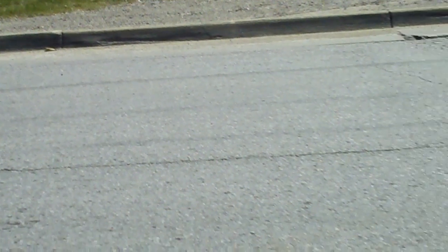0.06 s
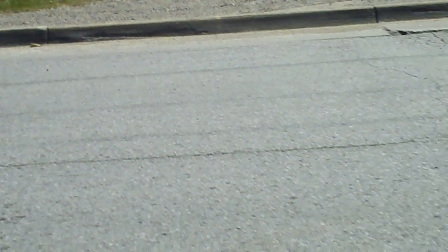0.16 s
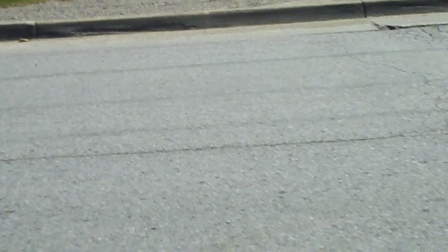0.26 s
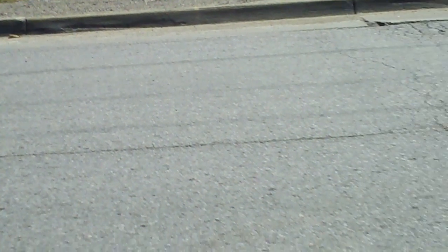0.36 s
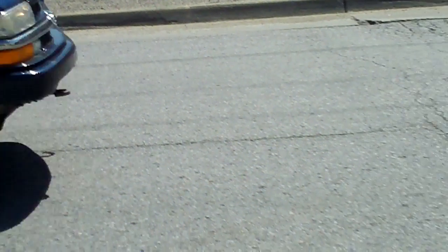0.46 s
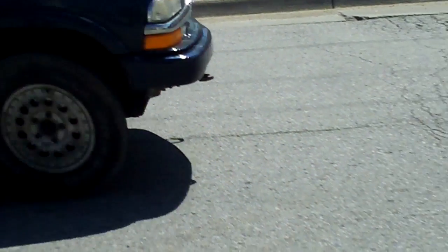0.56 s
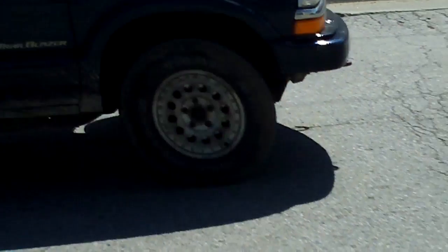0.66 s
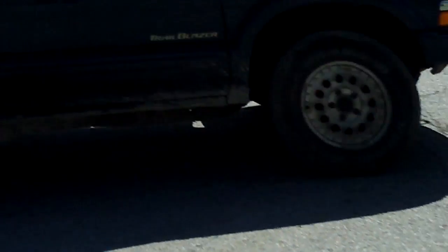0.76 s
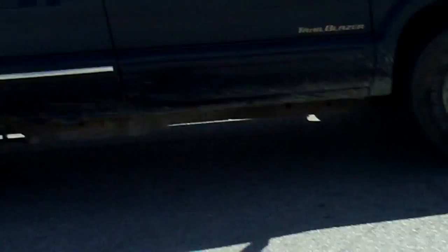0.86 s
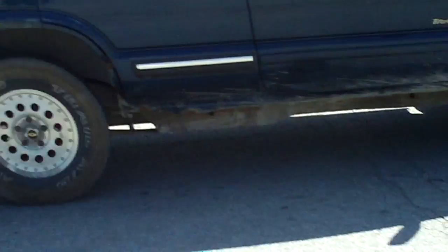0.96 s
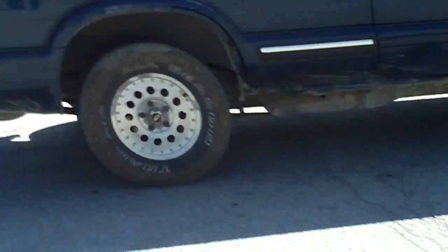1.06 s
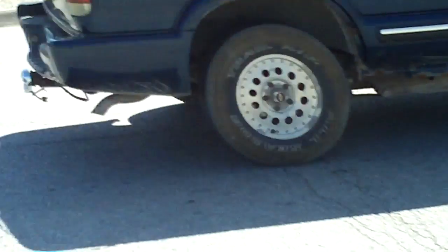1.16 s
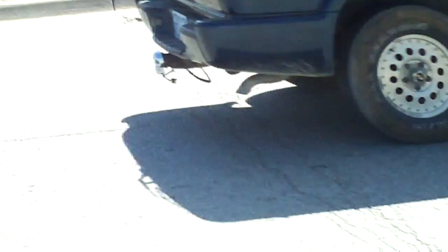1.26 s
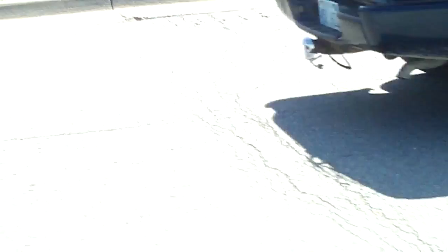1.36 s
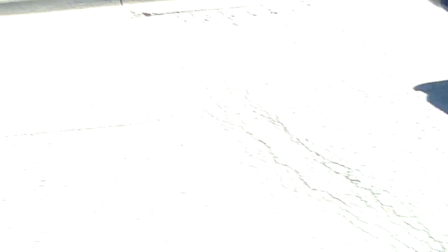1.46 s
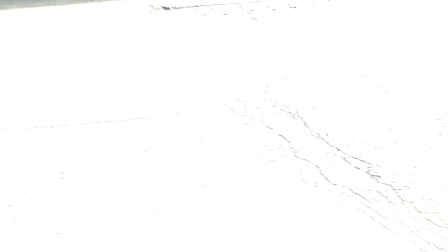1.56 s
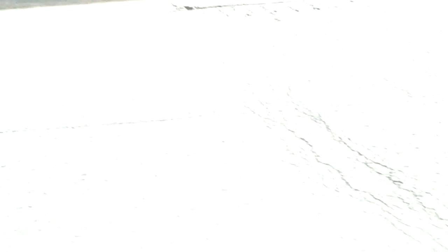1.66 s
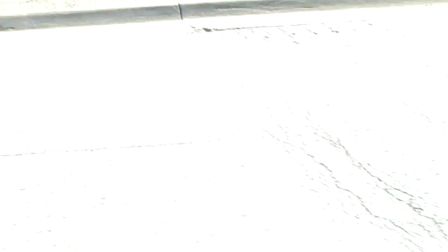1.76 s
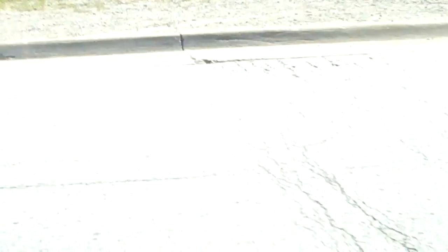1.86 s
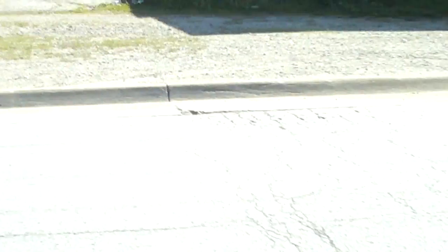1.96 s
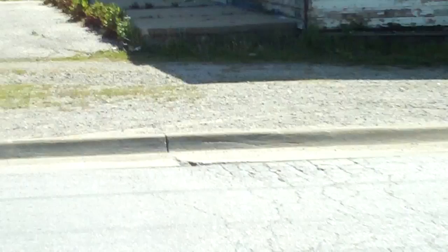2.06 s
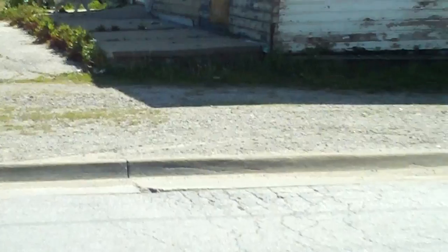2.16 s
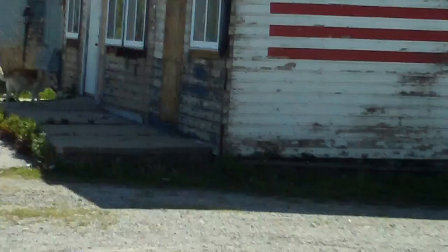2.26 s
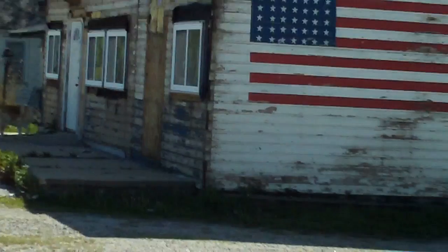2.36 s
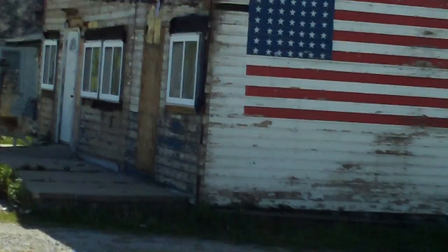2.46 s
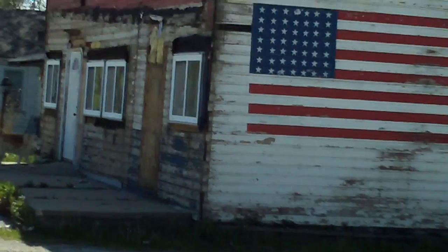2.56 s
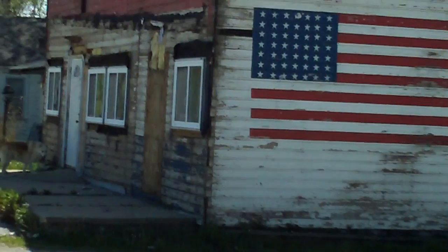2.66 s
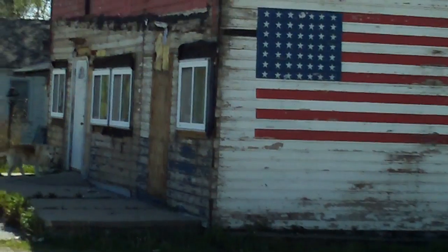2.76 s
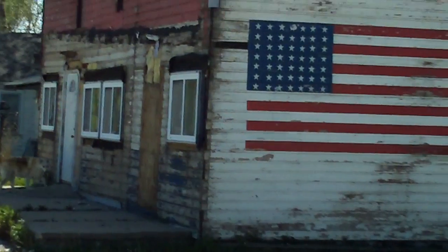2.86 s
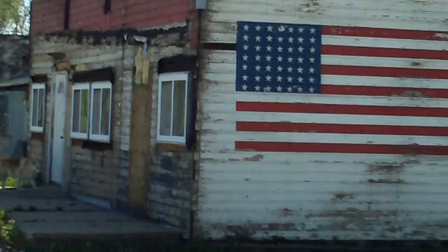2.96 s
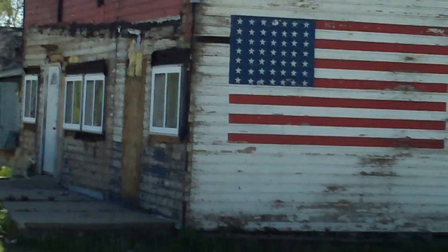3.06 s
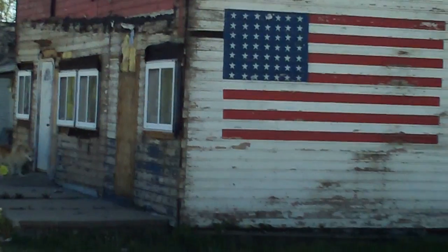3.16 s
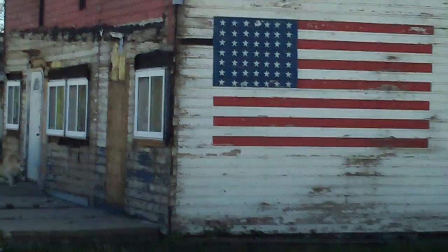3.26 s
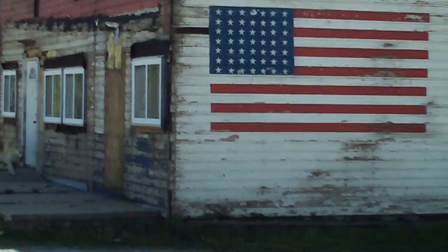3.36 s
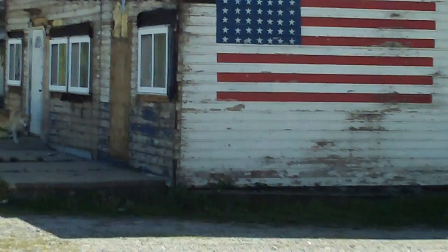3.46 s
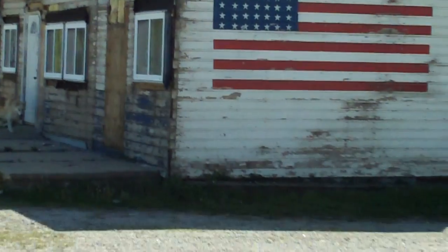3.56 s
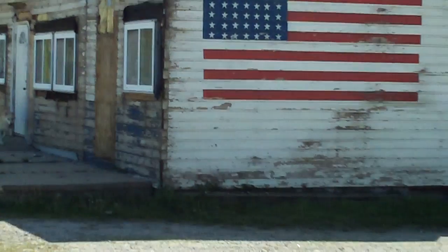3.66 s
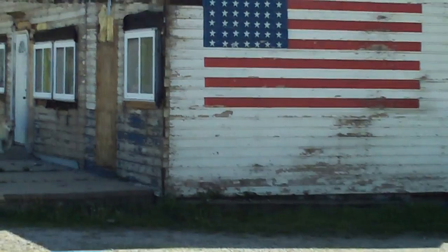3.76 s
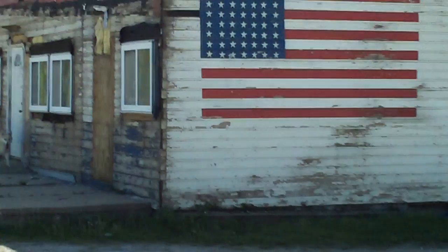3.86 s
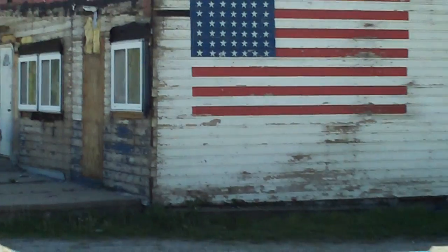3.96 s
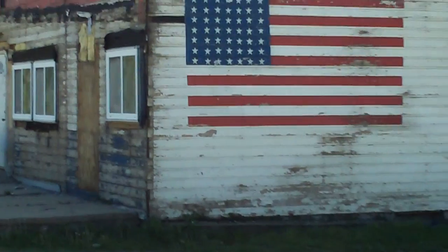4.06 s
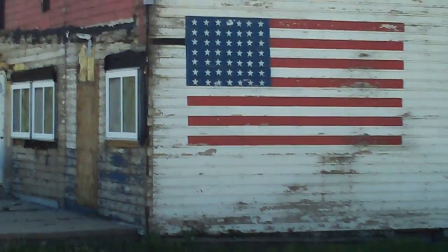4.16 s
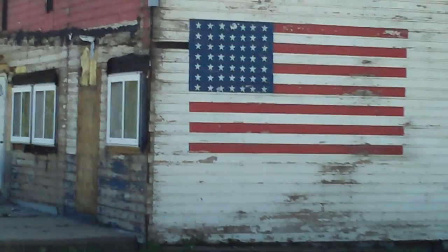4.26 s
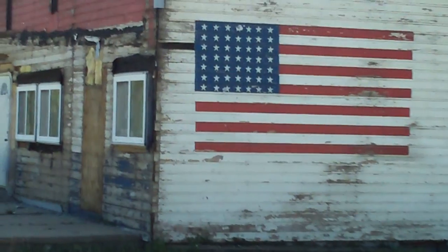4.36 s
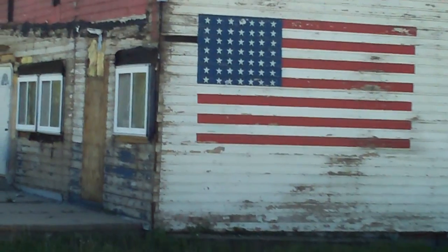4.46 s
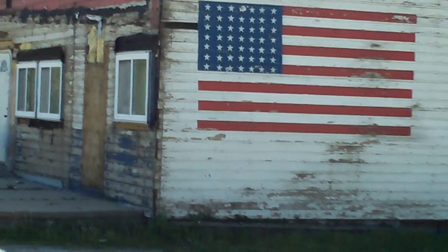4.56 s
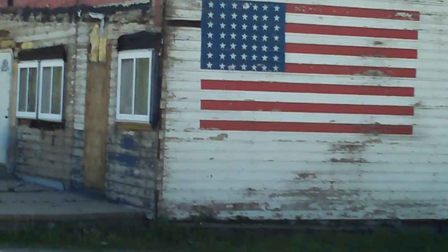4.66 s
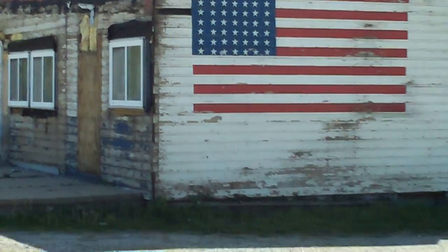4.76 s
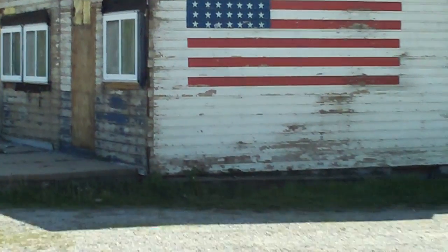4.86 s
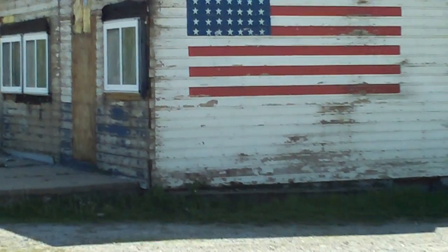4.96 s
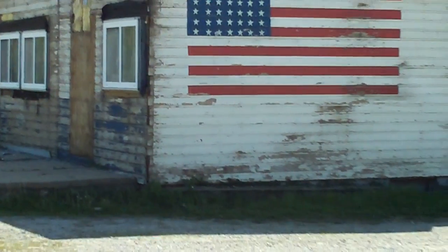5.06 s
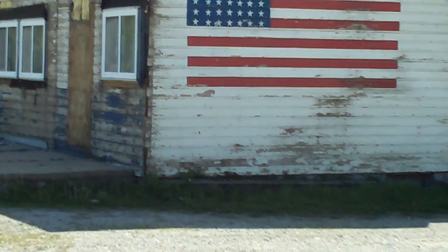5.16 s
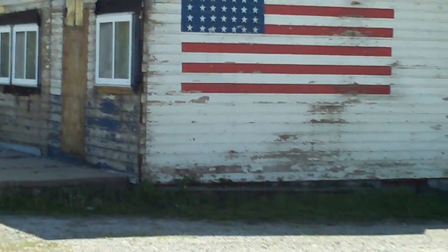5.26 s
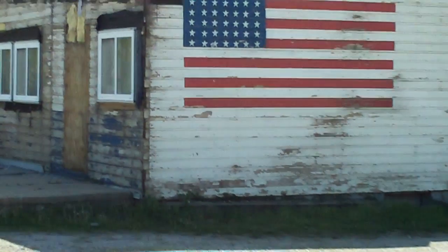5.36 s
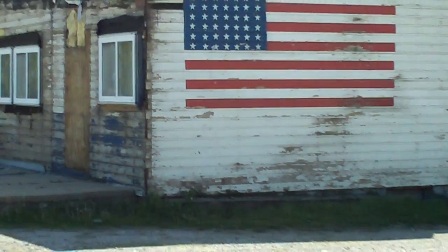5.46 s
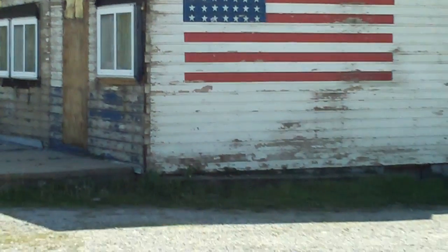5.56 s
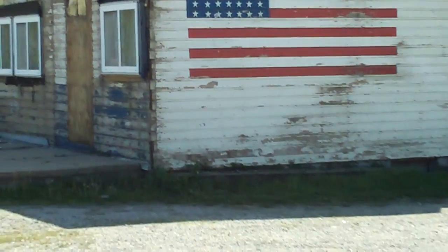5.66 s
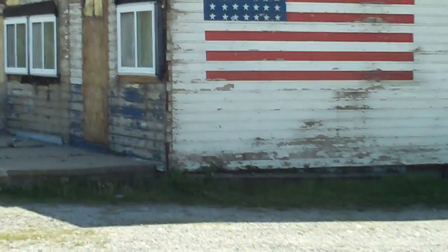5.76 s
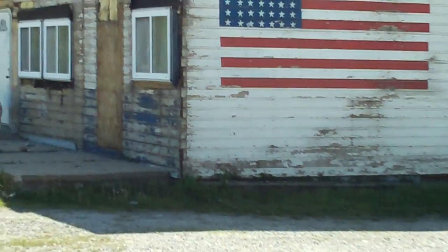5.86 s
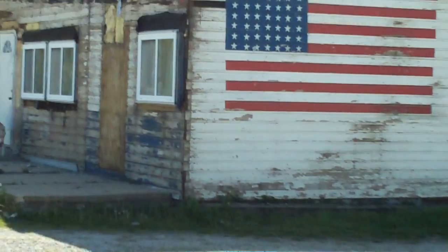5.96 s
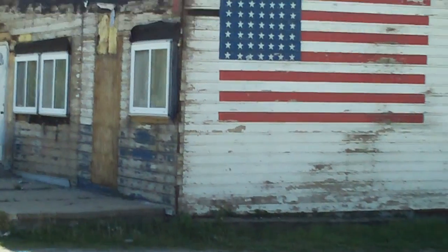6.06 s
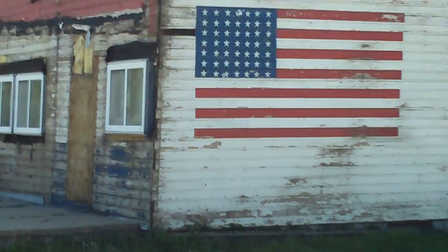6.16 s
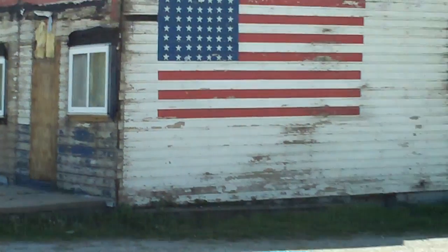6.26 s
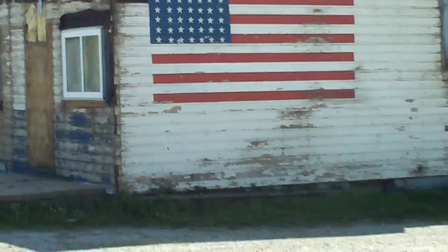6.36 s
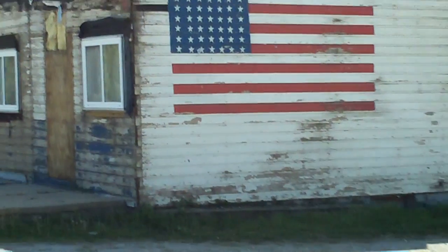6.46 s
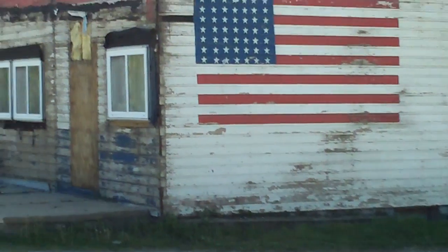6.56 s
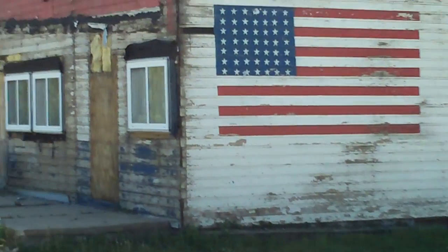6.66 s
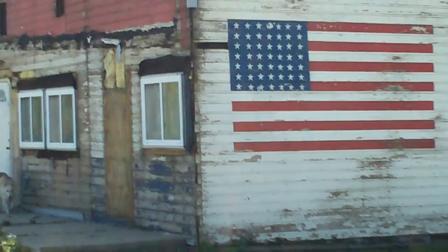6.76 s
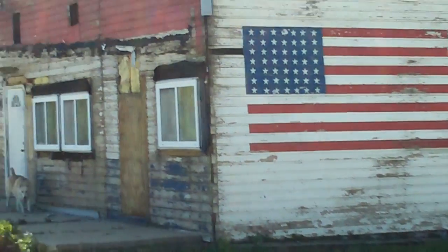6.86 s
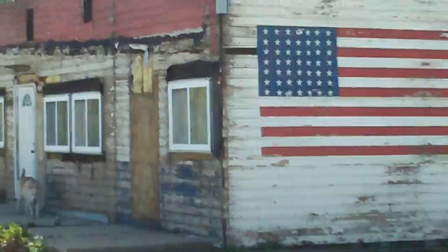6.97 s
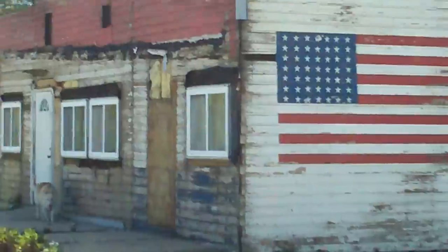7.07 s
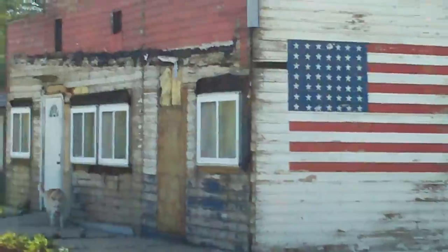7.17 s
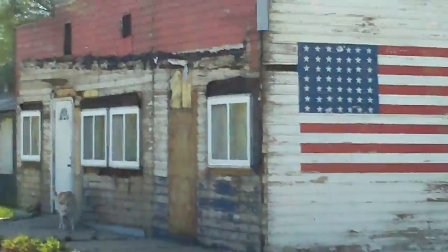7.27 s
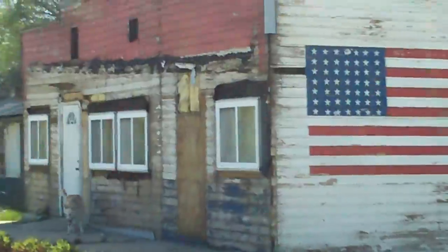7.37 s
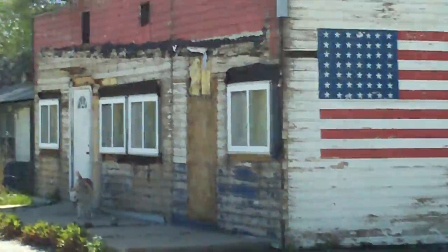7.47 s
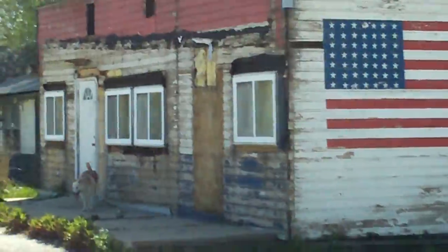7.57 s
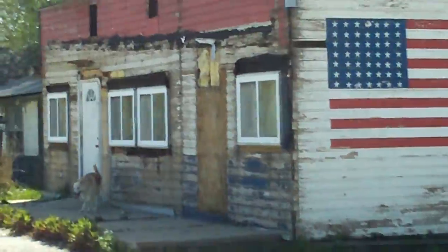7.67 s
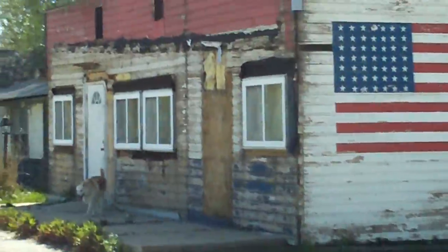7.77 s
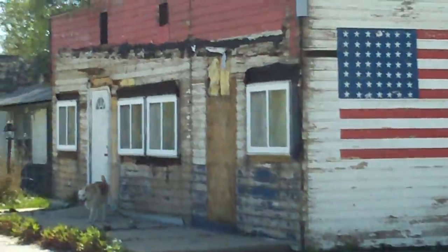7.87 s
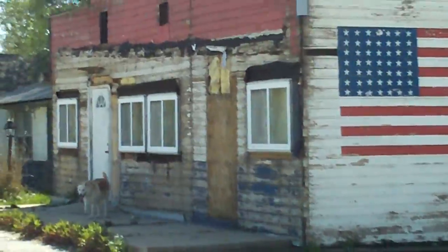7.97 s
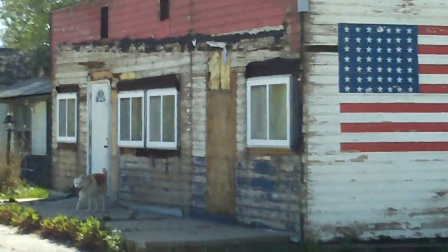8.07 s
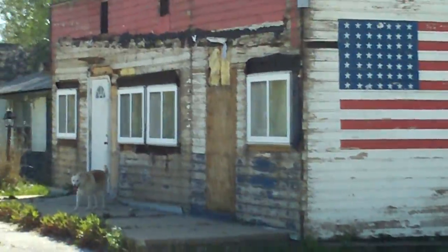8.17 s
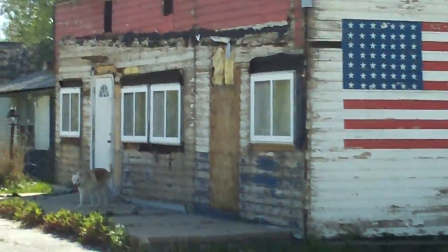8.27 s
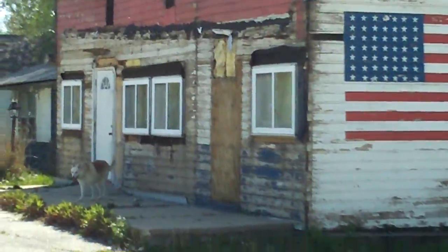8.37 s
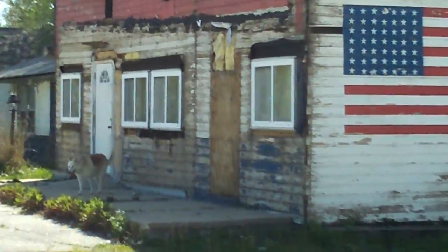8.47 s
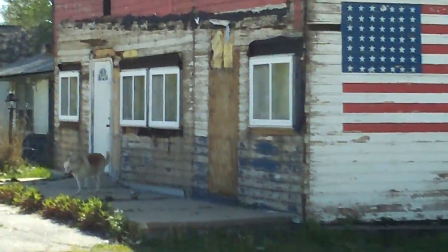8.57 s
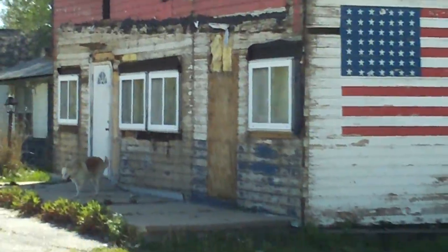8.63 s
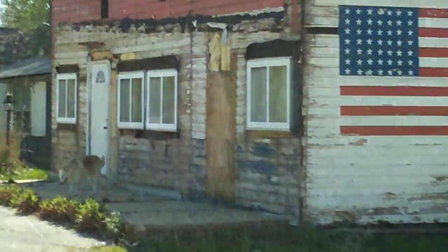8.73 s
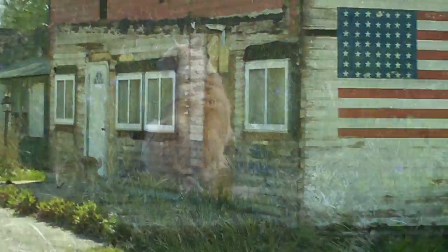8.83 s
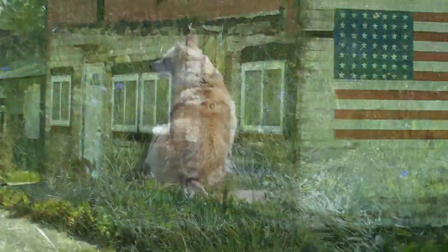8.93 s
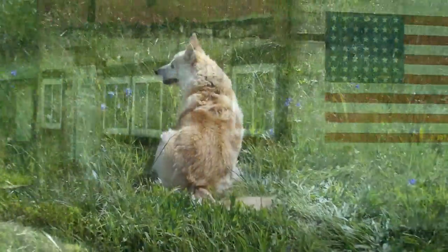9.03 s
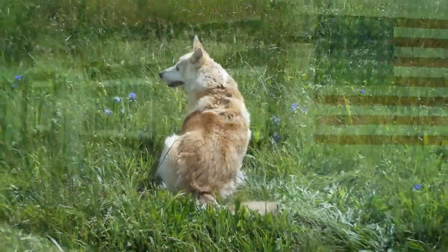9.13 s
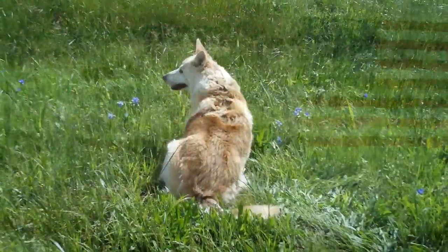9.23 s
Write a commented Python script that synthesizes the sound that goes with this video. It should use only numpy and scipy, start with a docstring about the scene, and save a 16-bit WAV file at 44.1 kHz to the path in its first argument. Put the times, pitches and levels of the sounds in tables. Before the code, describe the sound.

Close truck pass-by with throbbing exhaust and rushing tyres, slowly fading away, followed by wind buffets, bird chirps, a click and a thump.

```python
"""Small-town street: a six-cylinder truck passes close by and drives off, easing off the throttle after 5 s.
Exhaust: firing-rate harmonics plus a throbbing low note. Tyres: coloured noise that dulls with distance.
Noise also makes the town, far traffic, wind buffets on the microphone and faint grit ticks.
A bird chirps in short glides, a light tinkle rings, thin electronic tones hold steady.
Near the end a far motor hums, a click is heard, a breezy rustle from then on, and a thump."""
import sys
import numpy as np
from scipy import signal
from scipy.io import wavfile

SR = 44100
rng = np.random.default_rng(int(sys.argv[2]) if len(sys.argv) > 2 else 0)


def generate_wav(sig):
    """Save sig (samples, or channels by samples) to the path in sys.argv[1] as 16-bit PCM at SR."""
    pcm = np.round(np.clip(np.atleast_2d(sig).T, -1, 1) * 32767).astype(np.int16)
    wavfile.write(sys.argv[1], SR, pcm)


N = 410130
TIME = np.arange(N) / SR


def from_db(db):
    """Amplitude ratio of a level in dB."""
    return 10 ** (np.asarray(db) / 20)


def rms_one(x):
    """Scale to rms 1."""
    return x / np.sqrt(np.mean(x ** 2) + 1e-20)


def in_time(rows):
    """Each column of a curve, interpolated at every sample."""
    time_s, *columns = np.transpose(rows)
    return [np.interp(TIME, time_s, column) for column in columns]


def at_hz(points, hz):
    """Spectrum level in dB, read on a log frequency axis; -120 dB beyond its ends."""
    point_hz, db = np.transpose(points)
    return np.interp(np.log(hz), np.log(point_hz), db, left=-120, right=-120)


def drift(rate_hz):
    """Slow random wander, rms 1: noise through a double pole, computed every 40 samples."""
    pole = np.exp(-80 * np.pi * rate_hz / SR)
    white = rng.standard_normal(N // 40 + 2002)
    slow = signal.lfilter([1], [1, -2 * pole, pole * pole], white)[2000:]  # drop the filter's start-up
    return np.interp(np.arange(N) / 40, np.arange(len(slow)), rms_one(slow))


def turning(hz):
    """Phase [rad] of a cycle at hz, from a random start."""
    return 2 * np.pi * (np.cumsum(hz) / SR + rng.random())


def bandpass(low_hz, high_hz, x):
    """Second-order Butterworth band."""
    return signal.sosfilt(signal.butter(2, [low_hz, high_hz], "band", fs=SR, output="sos"), x)


def noise_bands(colour):
    """Third-octave noise bands that follow a spectrum: yields (centre [Hz], band)."""
    edges_hz = np.geomspace(12, 16000, 32)
    white = rng.standard_normal((2, N))  # neighbouring bands use different noise
    for k, (low_hz, high_hz) in enumerate(zip(edges_hz, edges_hz[1:])):
        centre_hz = np.sqrt(low_hz * high_hz)
        if colour[0][0] <= centre_hz <= colour[-1][0]:
            yield centre_hz, from_db(at_hz(colour, centre_hz)) * bandpass(low_hz, high_hz, white[k % 2])


def noise(colour):
    """Smooth coloured noise, rms 1."""
    return rms_one(sum(band for _, band in noise_bands(colour)))


def faint_hiss(level_db=-72):
    """Faint high hiss, independent in each channel."""
    # hiss spectrum: (frequency [Hz], relative density [dB per Hz])
    colour = [(4500, -10), (6000, -6), (12000, 1), (15000, -4)]
    return from_db(level_db) * np.array([noise(colour), noise(colour)])


def whine(waver_hz=3, flutter_hz=30, swing_hz=13):
    """Thin electronic tones at constant level; random waver and regular flutter in pitch."""
    # steady tones: (frequency [Hz], level [dB])
    tones = [(6595, -76), (7865, -72.5), (13187, -62.5)]
    shift_hz = waver_hz * drift(25) + swing_hz * np.sin(2 * np.pi * flutter_hz * TIME)
    return sum(np.sqrt(2) * from_db(db) * np.sin(turning(hz + shift_hz)) for hz, db in tones)


def town(level_db=-37.5):
    """Steady coloured noise of the town."""
    # town spectrum: (frequency [Hz], relative density [dB per Hz])
    colour = [(150, -0.5), (270, -0.5), (350, -8.5), (550, -9.5), (1050, -7), (1400, -13), (2000, -16.5),
              (2800, -22), (4400, -44), (6000, -49), (7800, -35.5), (9500, -66), (12600, -32), (14000, -55),
              (15500, -67)]
    return from_db(level_db) * noise(colour)


def far_traffic():
    """A far wash of traffic: coloured noise that swells and ebbs."""
    # wash level: (time [s], level [dB])
    levels = [(0, -60), (5, -55.5), (6.2, -54), (6.85, -41), (7.2, -45.5), (7.5, -46), (8.3, -61),
              (9.3, -65)]
    # wash spectrum: (frequency [Hz], relative density [dB per Hz])
    colour = [(650, 7.5), (1050, 6.5), (1700, 12.5), (2300, -14), (3500, -23)]
    level_db, = in_time(levels)
    return from_db(level_db) * noise(colour)


def wind(mean_db=-22.5, swing_db=.5, lumps_hz=4):
    """Lumpy low-frequency pressure at the microphone, with a few harder gusts."""
    # gusts, Gaussian in time: (peak time [s], level [dB], standard deviation [s])
    gust_rows = [(.47, -19, .07), (2.19, -14.5, .08), (2.548, -12.5, 0.072), (5.141, -15.5, 0.058),
                 (5.381, -20, 0.071), (7.216, -19.5, 0.049), (9.093, -11.5, 0.015), (9.24, -12, 0.032)]
    # wind spectrum: (frequency [Hz], relative density [dB per Hz])
    colour = [(12, -4.5), (20, 2), (40, -5), (65, -6), (100, -10.5), (160, -20.5), (300, -47)]
    gusts = sum(from_db(db) * np.exp(-.5 * ((TIME - s) / length_s) ** 2) for s, db, length_s in gust_rows)
    steady = from_db(mean_db + swing_db * drift(lumps_hz))
    return np.hypot(steady, gusts) * noise(colour)


def bird(warble=.02):
    """Small bird: each chirp is a short, slightly rough glide."""
    # chirps: (time [s], start pitch [Hz], end pitch [Hz], length [s], level [dB])
    chirps = [(5.628, 3400, 3500, 0.0251, -49), (7.215, 3900, 3400, .045, -51),
              (7.315, 4350, 4470, .02, -56), (7.323, 4850, 4950, .025, -56)]
    out = np.zeros(N)
    rough = 1 + warble * drift(90)
    for s, start_hz, end_hz, length_s, db in chirps:
        start, size = int(s * SR), int(length_s * SR)
        hz = np.linspace(start_hz, end_hz, size) * rough[start:start + size]
        envelope = np.sqrt(2 * np.hanning(size))
        out[start:start + size] += from_db(db) * envelope * np.sin(turning(hz))
    return out


def tag():
    """Light metal tinkle, as of a dog's tag: each touch rings the same few high modes."""
    # touches: (time [s], level [dB])
    touches = [(7.802, -52), (7.823, -49)]
    # ringing modes: (frequency [Hz], level re touch [dB], decay time constant [s])
    modes = [(6400, -1, 0.014), (6560, -12, .025), (6020, -5, .006), (7400, -10, .004)]
    out, t = np.zeros(N), TIME[:SR // 5]
    ring = sum(from_db(db) * np.sin(2 * np.pi * hz * t) * np.exp(-t / decay_s) for hz, db, decay_s in modes)
    for s, db in touches:
        start = int(s * SR)
        out[start:start + len(t)] += from_db(db) * ring
    return out


def grit():
    """Gritty ticks, scuffs and bumps: each contact is a decaying crunch of band-passed noise."""
    # contacts: (time [s], level before decay [dB], centre [Hz], width [octaves], decay time constant [s])
    contacts = [(1.895, -37, 4000, 1.5, 0.03), (3.968, -25, 1020, 0.83, 0.0051),
                (4.885, -24, 1015, 0.68, 0.003), (5.062, -47, 6480, 1.48, .003),
                (6.048, -48, 8910, 1, 0.0018), (6.204, -33, 1298, 1.6, 0.017),
                (6.208, -55, 5530, 1.8, 0.0077), (6.312, -44, 5000, 1.8, 0.0025),
                (7.47, -35.5, 1160, 1.05, 0.082), (7.513, -45, 7160, 1.4, 0.02),
                (8.057, -50, 7600, .6, .005), (9.236, -18, 207.2, 0.83, 0.015)]
    out = np.zeros(N)
    for s, db, hz, octaves, decay_s in contacts:
        start = int(s * SR)
        t = TIME[:min(SR // 5, N - start)]
        half_width = 2 ** (octaves / 2)
        crunch = rms_one(bandpass(hz / half_width, hz * half_width, rng.standard_normal(len(t))))
        out[start:start + len(t)] += from_db(db) * crunch * np.exp(-t / decay_s)
    return out


def far_motor(octave_db=-9, between_db=-12):
    """Low wavering hum with overtones at 2 and 1.5 times its pitch."""
    # hum: (time [s], mean pitch [Hz], fundamental level [dB])
    hum_rows = [(8.5, 119, -67), (8.8, 117.1, -35.5), (9.0, 122.2, -30.5), (9.15, 122.5, -22.5),
                (9.3, 128, -27)]
    hz, db = in_time(hum_rows)
    phase = turning(hz * (1 + 0.00752 * drift(6.6)))
    overtones = from_db(octave_db) * np.sin(2 * phase) + from_db(between_db) * np.sin(3 * phase / 2)
    return np.sqrt(2) * from_db(db) * (np.sin(phase) + overtones) * (TIME > hum_rows[0][0])


def click_and_breeze(click_s=9.0775, offset_db=-9, settle_s=0.014, breeze_db=-40):
    """A click: the waveform jumps negative and settles exponentially; a bright rustle is heard from then on."""
    # breeze spectrum: (frequency [Hz], relative density [dB per Hz])
    colour = [(300, 17.5), (1000, -4), (3400, -7), (5500, -23), (7000, -15), (8000, -6), (9500, -26),
              (13000, -29)]
    since_s = np.maximum(TIME - click_s, 0)
    offset = from_db(offset_db) * np.exp(-since_s / settle_s)
    return (since_s > 0) * (from_db(breeze_db) * noise(colour) - offset)


def road_rumble():
    """Low road noise under the truck."""
    # rumble level: (time [s], level [dB])
    levels = [(0, -22.5), (1, -18.5), (2, -29.5), (3.5, -26), (5, -28), (6.3, -29), (7.5, -30.5),
              (8.3, -28), (9, -28.5), (9.3, -29)]
    # rumble spectrum: (frequency [Hz], relative density [dB per Hz])
    colour = [(50, -5), (68, 1.5), (86, 5.5), (110, -1), (137, -4), (172, -11.5), (220, -4.5), (275, -9.5),
              (345, -25.5), (450, -38)]
    level_db, = in_time(levels)
    return from_db(level_db) * noise(colour)


def front_tyre_sizzle():
    """High hiss of the front tyres, brightest as they approach."""
    # sizzle level: (time [s], level [dB])
    levels = [(0, -47), (.35, -41), (.8, -49), (1.4, -75)]
    # sizzle spectrum: (frequency [Hz], relative density [dB per Hz])
    colour = [(6200, -7), (8800, 0), (12000, -13)]
    level_db, = in_time(levels)
    return from_db(level_db) * noise(colour)


def tyre_levels(closest_s=0.96, closest_m=3.81, speed_m_per_s=5.22):
    """Untrimmed roar, rush and hiss levels on a straight path: fixed dB lost per doubling of distance."""
    # rows roar, rush, hiss: (level at the closest point [dB], loss per doubling [dB])
    bands = [(-27, 5.5), (-27, 6), (-35.5, 10)]
    # extra treble: (time [s], rush [dB], hiss [dB])
    treble = [(0, 2, -1), (.4, 1, 0), (1.4, 0.5, 0), (2.0, -0.5, 1.5), (3.0, 1.5, 1), (3.8, -2.5, -2),
              (4.9, -1, 1), (5.8, 2.5, 1.5), (8.6, 1, -1)]
    distance_m = np.hypot(closest_m, speed_m_per_s * (TIME - closest_s))
    doublings = np.log2(distance_m / closest_m)
    roar_db, rush_db, hiss_db = [db - loss_db * doublings for db, loss_db in bands]
    more_rush_db, more_hiss_db = in_time(treble)
    return [roar_db, rush_db + more_rush_db, hiss_db + more_hiss_db]


def tread_ring(roar_db):
    """Air in tread grooves and wheel wells rings at a few resonances, as band-passed noise."""
    # resonances: (centre [Hz], width [Hz], level re untrimmed roar [dB], extra loss [dB per dB of roar fade])
    resonances = [(538, 62, -6.5, 0.2), (1037, 145, -6.5, 0.4), (1398, 90, -19, -0.7), (1800, 170, -24, -1),
                  (3160, 1000, -8.5, 4.5)]
    white = rng.standard_normal(N)
    faded_db = roar_db.max() - roar_db
    out = 0
    for hz, width_hz, db, loss in resonances:
        ring = rms_one(bandpass(hz - width_hz / 2, hz + width_hz / 2, white))
        out = out + from_db(roar_db + db - loss * faded_db) * ring
    return out


def tyres(levels_db, cycle, trim_db=-1.2, patchy_db=1.37, chuff=0.07):
    """Tread noise loses its treble first as the truck leaves; close by it pulses with the firings."""
    # tyre spectrum: (frequency [Hz], relative density [dB per Hz])
    colour = [(300, 0), (440, -2.5), (550, -4.5), (700, -4.5), (880, -6), (1100, -11.5), (1390, -8.5),
              (1750, -9), (2200, -11), (3000, -14), (5000, -18.5), (7000, -22.5), (11000, -30),
              (13000, -20), (15500, -57)]
    # rows roar, rush, hiss: (low edge [Hz], high edge [Hz])
    bands_hz = [(350, 1000), (1300, 3500), (5500, 12500)]
    step_hz = 10
    grid_hz = np.arange(20., 16000, step_hz)
    power = from_db(at_hz(colour, grid_hz)) ** 2 * 2 * step_hz / SR  # white noise of variance 1, coloured
    gains_db = []
    for db, (low_hz, high_hz) in zip(levels_db, bands_hz):
        inside = (grid_hz > low_hz) & (grid_hz < high_hz)
        gains_db.append(db - 10 * np.log10(power[inside].sum()))
    log_centres = np.log(bands_hz).mean(axis=1)
    out = 0
    for hz, band in noise_bands(colour):
        # blend the gains of the nearest bands
        shares = [np.interp(np.log(hz), log_centres, row) for row in np.eye(len(log_centres))]
        gain_db = sum(share * gain for share, gain in zip(shares, gains_db))
        out = out + band * from_db(gain_db + patchy_db * drift(23.5))
    near = from_db(levels_db[0] - levels_db[0].max())
    firing = np.sin(6 * cycle)
    return from_db(trim_db) * out * (1 + chuff * near * firing)


def boom(waver_db=0.55):
    """The deepest exhaust note throbs as it beats against a weaker tone a few Hz below."""
    # note: (time [s], pitch [Hz], mean level [dB])
    note = [(0, 80, -16), (.5, 81.5, -11.5), (1.0, 83, -8.5), (1.6, 83.5, -9.5), (2.0, 85.5, -15.5),
            (2.6, 86, -15.5), (3.2, 85.5, -17), (3.6, 87, -18), (4.3, 83, -24), (4.8, 80.5, -31.5),
            (6.6, 81.5, -29.5)]
    # beating: (time [s], throb rate [Hz], depth [0-1])
    throb = [(0, 4.6, 0.05), (.45, 3.5, 0.7), (.65, 5.1, 0), (1.05, 4.7, 0.37), (1.25, 3.24, 0.34),
             (2.15, 3.2, 0.64), (2.35, 5, 0.6), (2.8, 5, 0.48), (3.05, 2.2, 0.11), (3.6, 2.22, .5),
             (4, 6.8, 0.82)]
    hz, db = in_time(note)
    throb_hz, depth = in_time(throb)
    phase = turning(hz)
    beat = 2 * np.pi * np.cumsum(throb_hz) / SR
    pair = (np.sin(phase) - depth * np.sin(phase - beat)) / np.hypot(1, depth)
    fade = np.interp(TIME, (6.43, 6.86), [1, 0])  # s
    return np.sqrt(2) * from_db(db + waver_db * drift(7)) * pair * fade


def exhaust(roar_db, second_trim_db=-.5, rasp_trim_db=-2, rasp_fade=0.074, jitter=0.0011,
            second_waver_db=2.5, third_waver_db=0.6, uneven_waver_db=4.0):
    """Firing-rate harmonics, and between them weaker lines of six unequal cylinders; also returns cycle phase."""
    # engine speed: (time [s], mean firing rate [Hz])
    speed = [(0, 86.5), (.2, 87.4), (.42, 78.55), (.6, 74.5), (.8, 75.13), (1.3, 79.57), (1.7, 80.96),
             (2.75, 81.9), (3.1, 84.56), (3.5, 87.3), (3.8, 83.64), (4.1, 79.67), (4.85, 76.8), (5.0, 78.8),
             (5.2, 73.8), (5.7, 68.4), (6.3, 65.2)]
    # drone: (time [s], second firing harmonic before trim [dB], third firing harmonic [dB])
    drone = [(0, -15.5, -19.5), (.3, -23.5, -20), (.6, -19, -26), (.95, -16, -25), (1.5, -20.5, -18.5),
             (2.1, -25.5, -17.5), (2.9, -28.5, -20), (3.4, -23.5, -22.5), (3.85, -27, -20.5),
             (4.6, -24, -23), (5.0, -28.5, -24.5), (5.2, -26, -34), (5.35, -27.5, -44), (5.7, -25, -53),
             (6.1, -25.5, -54)]
    # overtones of uneven cylinders: (multiple of cycle rate, level re third firing harmonic [dB])
    uneven = [(3, -10.5), (9, -9), (13, -16), (15, -12.5), (17, -14), (19, -11), (20, -21)]
    # overtones heard only close by: (multiple of cycle rate, level re untrimmed roar, before rasp trim [dB])
    rasp = [(9, 7), (10, 2.5), (15, -1), (20, -5.5), (21, -2.5), (22, -5.5), (23, -3.5), (27, -4.5),
            (30, -9.5), (36, -21), (42, -19)]
    firing_hz, = in_time(speed)
    second_db, third_db = in_time(drone)
    cycle = turning(firing_hz * (1 + jitter * drift(10)) / 6)  # six firings a cycle

    def overtone(multiple, db, waver_db):
        """One line of the cycle, its level wavering."""
        level_db = db + waver_db * np.minimum(drift(4.5), 1.2)
        return np.sqrt(2) * from_db(level_db) * np.sin(multiple * cycle + 2 * np.pi * rng.random())

    out = overtone(12, second_db + second_trim_db, second_waver_db)
    out += overtone(18, third_db, third_waver_db)
    out += sum(overtone(k, third_db + db, uneven_waver_db) for k, db in uneven)
    # the rasp fades slightly faster than the roar
    rasp_db = roar_db - rasp_fade * (roar_db.max() - roar_db) + rasp_trim_db
    out += sum(overtone(k, rasp_db + db, uneven_waver_db) for k, db in rasp)
    fade = np.interp(TIME, (6.08, 6.25), [1, 0])  # s
    return out * fade, cycle


def scene():
    """Town, wind, small sounds and truck in mono; only the faint hiss differs between the channels."""
    levels_db = tyre_levels()
    roar_db = levels_db[0]
    engine, cycle = exhaust(roar_db)
    background = town() + far_traffic() + whine() + wind()
    details = bird() + tag() + grit() + far_motor() + click_and_breeze()
    rolling = road_rumble() + front_tyre_sizzle() + tread_ring(roar_db) + tyres(levels_db, cycle)
    truck = rolling + boom() + engine
    return background + details + truck + faint_hiss()


def record(dry):
    """Clip peaks at full scale, then cut the top with a steep low-pass."""
    lowpass = signal.ellip(10, .1, 80, 15400, fs=SR, output="sos")  # ripple dB, stopband dB, cutoff Hz
    return signal.sosfilt(lowpass, np.clip(dry, -1, 1))


dry = scene()
out = record(dry)
generate_wav(out)
```